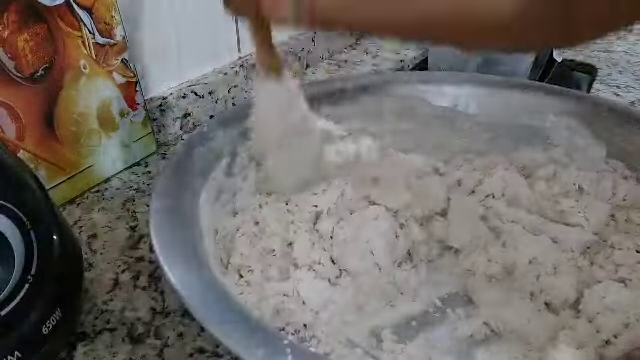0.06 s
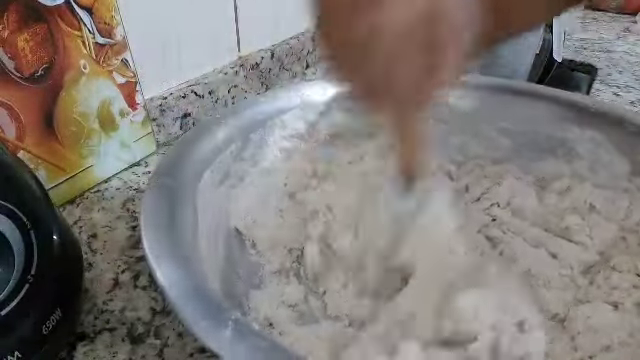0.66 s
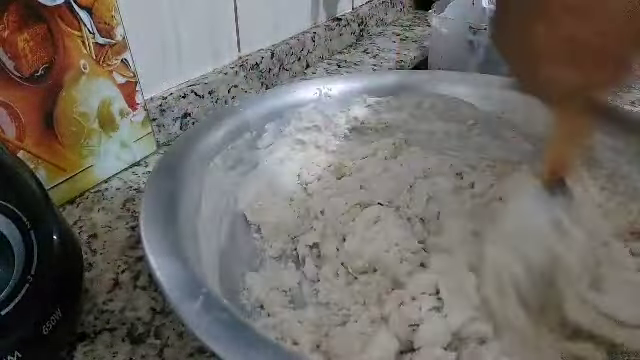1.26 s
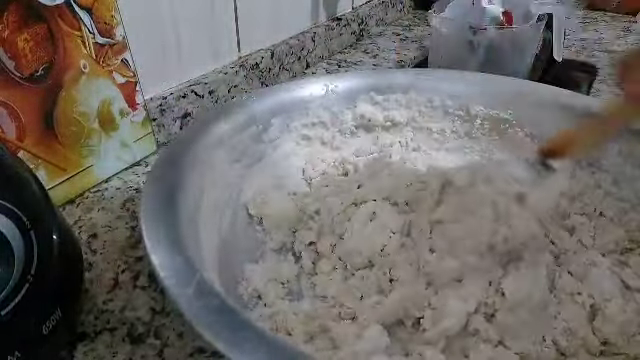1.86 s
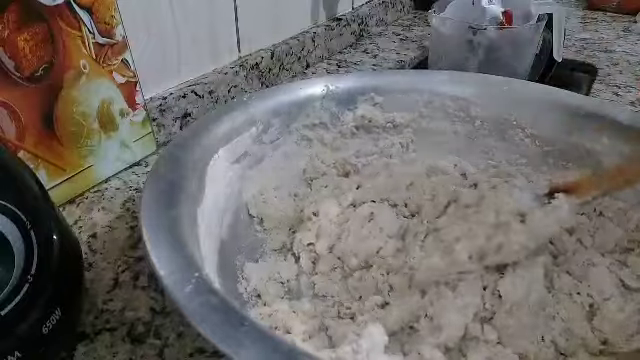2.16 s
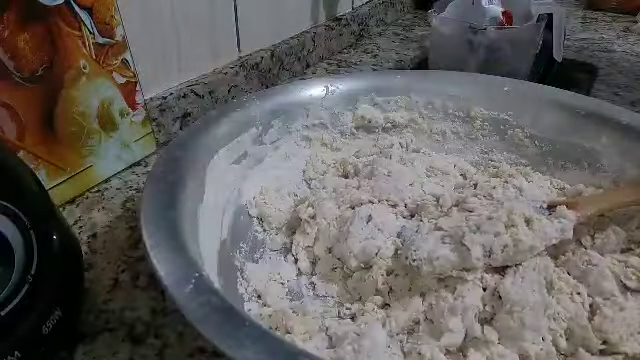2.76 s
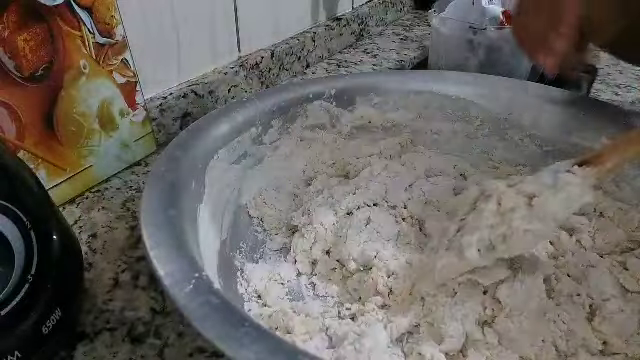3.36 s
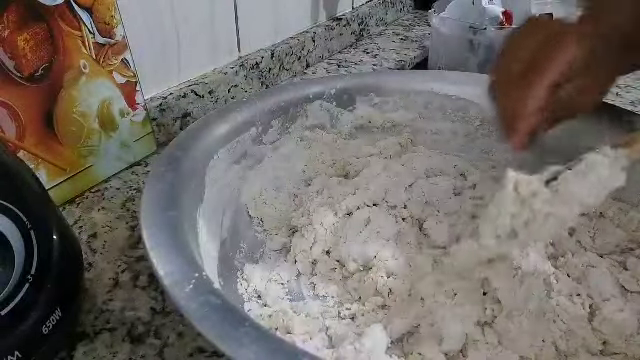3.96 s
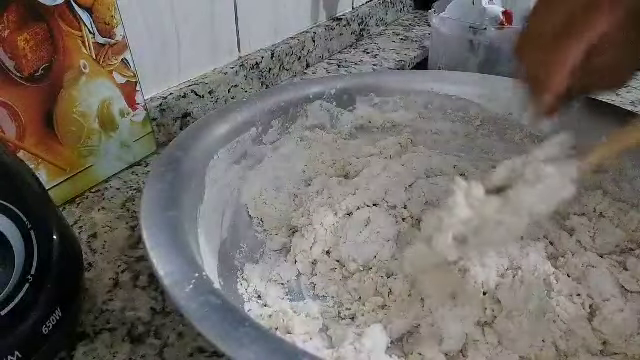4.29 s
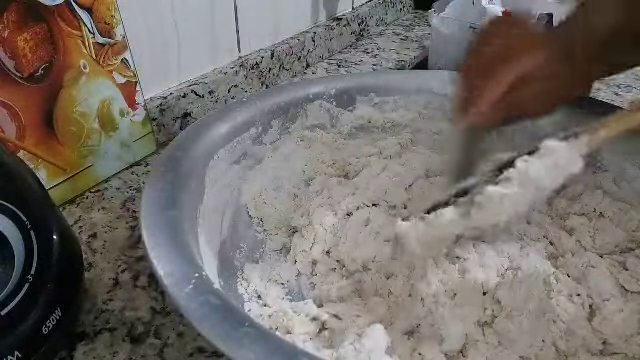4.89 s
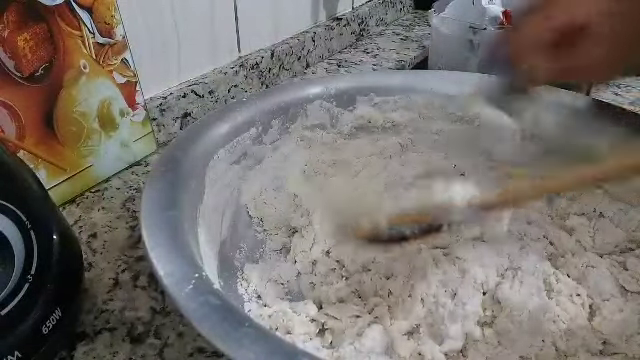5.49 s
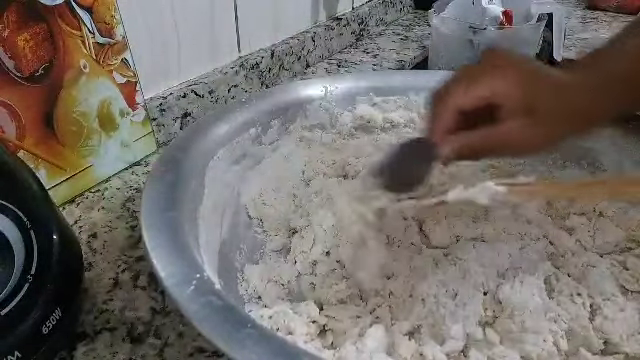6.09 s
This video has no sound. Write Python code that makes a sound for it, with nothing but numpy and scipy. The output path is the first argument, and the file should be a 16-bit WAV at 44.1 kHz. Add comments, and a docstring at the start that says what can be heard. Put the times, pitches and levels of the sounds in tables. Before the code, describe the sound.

For the first two seconds a wooden spoon stirs floury dough in a wide metal bowl: crumbs rustle, the wood rubs softly on the wall, and a lump flops with a dull thud at about 0.4 seconds. After a few light ticks, the handle drops on the rim at 2.3 seconds with a loud knock, bouncing quickly and making the bowl ring briefly. Around 2.8 seconds the bowl grates over a stone counter in two quick jerks, and loose flour slides. From 3.5 seconds to about 6, a metal spoon scrapes dough off the wooden one in short, quieter, squeaky strokes, mixed with dry ticks and soft thuds. One sharp, loud tap stands out at 5.7 seconds. Everything is close and straight ahead, with a little kitchen echo on the knocks and a faint appliance hum and hiss underneath.

```python
"""A wooden spoon stirs floury dough in a wide metal bowl: crumbs rustle and lumps flop over.
The spoon drops on the rim with a loud knock that sets the bowl ringing, and the bowl is shoved
over the kitchen counter. Then a metal spoon scrapes sticky dough off the wooden one in short,
squeaky strokes. The rubbing sounds are made of many tiny slips, coloured by what is rubbed.
A mains hum and a faint hiss lie under it all."""
import sys
import numpy as np
from scipy import signal
from scipy.fft import rfft, irfft, next_fast_len
from scipy.io import wavfile
from scipy.ndimage import uniform_filter1d, minimum_filter1d, map_coordinates

SR = 44100
rng = np.random.default_rng(int(sys.argv[2]) if len(sys.argv) > 2 else 0)


def unload_wav(signal):
    """Save mono or channel-first audio to the path in sys.argv[1] as 16-bit WAV at rate SR, clipped to [-1, 1]."""
    wavfile.write(
        sys.argv[1],
        SR,
        np.round(np.clip(np.atleast_2d(signal).T, -1, 1) * 32767).astype(np.int16),
    )


N = 275202
FFT_SIZE = next_fast_len(N, True)
TIME = np.arange(N) / SR
FREQ = np.maximum(np.fft.rfftfreq(FFT_SIZE, 1 / SR), 1)

# The spoon presses on the bowl's wall. Each row: middle in seconds, length in seconds,
# level in dB, pitch that stands out in Hz.
WALL_PRESSES = [(0.171, 0.11, -68, 1900), (0.364, 0.13, -60.5, 2720), (0.627, 0.25, -63.5, 1840),
                (1.057, 0.1, -65.5, 1900), (1.233, 0.16, -59, 2210), (1.777, 0.048, -65.5, 1750),
                (2.213, 0.27, -63.5, 1900)]
# The tone of a dull thud. Each row: frequency in Hz, relative level in dB.
THUD_COLOUR = [(100, -17.5), (220, -15.5), (350, -4), (700, -2.5), (1300, -6), (1900, -8.5), (3000, -25)]


def stirring():
    """Floury crumbs rustle past the wood and drag on the bowl, while loose flour slides down."""
    # How hard the spoon works, one list for each of four turns. Each pair: time in seconds, level in dB.
    turns = [
        [(0.0, -73), (0.08, -77.5), (0.416, -47.5), (0.502, -47.5), (0.6, -59.5), (0.696, -51.5), (0.9, -76.5)],
        [(0.9, -91), (0.932, -63.5), (1.054, -60.5), (1.156, -63.5), (1.22, -55), (1.3, -61), (1.45, -80)],
        [(1.45, -79), (1.456, -85), (1.548, -67), (1.628, -81), (1.66, -64), (1.786, -55), (1.94, -67)],
        [(1.94, -72), (1.97, -54.5), (1.994, -50.5), (2.046, -59.5), (2.082, -50), (2.302, -59.5), (2.305, -52)],
    ]
    # Sliding flour. Each row: peak time in seconds, hiss level in dB, rise in seconds, fade in seconds,
    # crumb level in dB relative to the hiss. A fade time (t60) is how long a sound takes to drop 60 dB.
    spills = [(.3, -54.5, 0.11, 0.68, -19), (1.08, -52.5, 0.15, 0.49, -22), (1.57, -63.5, 0.13, 1.4, -19),
              (1.981, -45, 0.04, 0.5, -16), (2.97, -46.5, 0.036, 1.2, -3.5), (3.56, -62.5, 0.068, 0.88, -3),
              (4.799, -70, .02, 0.39, -6), (5.46, -68, 0.059, .6, -6), (5.88, -62, .1, 1.02, -15)]
    # The tone of rubbed dough. Each row: frequency in Hz, relative level in dB.
    dough_colour = [(300, -15.5), (700, -6), (1300, -1.5), (2500, -4), (5000, 4.5), (8000, -0.5),
                    (10500, 4), (12500, 4), (14000, 0.5), (15500, -6)]
    # Pitches the bowl strengthens. Each row: pitch in Hz, width in Hz, boost in dB.
    bowl_peaks = [(1853, 188, 5.5), (2860, 970, 6), (4070, 870, 3.5)]
    crumbs = grains(per_s=4000, spread_db=2, smooth_db=3)
    low, middle, high = rubbing(crumbs, colour(dough_colour, bowl_peaks), body_hz=2370, edge_hz=6250)
    effort = from_db(np.interp(TIME, *np.vstack(turns).T, right=-150))
    fine = together(surge(s, db, rise_s, t60) for s, db, rise_s, t60, _ in spills)
    coarse = together(surge(s, db + crumb_db, rise_s, t60) for s, db, rise_s, t60, crumb_db in spills)
    pressed = together(from_db(db) * hump(s, length) for s, length, db, _ in WALL_PRESSES)
    drag = low * together([from_db(-8) * effort, from_db(-6) * coarse, from_db(-3) * pressed])
    rustle = middle * together([from_db(-2) * effort, coarse])
    flour_hiss = high * together([from_db(0.5) * effort, fine])
    return drag + rustle + flour_hiss


def flopping():
    """Lumps of dough turn over and flop down with dull thuds."""
    # Each row: peak time in seconds, level in dB, rise in seconds, fade in seconds.
    flops = [(0.437, -35.5, 0.014, 0.095), (.48, -39, 0.12, 0.36), (.69, -52.5, 0.25, 1.3),
             (.925, -56.5, 0.018, 0.37), (1.745, -58.5, 0.024, 0.24), (5.347, -55.5, 0.03, .15)]
    lumps = shaped(grains(per_s=310, spread_db=5.5, smooth_db=11), colour(THUD_COLOUR))
    return lumps * together(surge(*flop) for flop in flops)


def wall_singing():
    """The bowl sings faintly under each press; which pitch stands out depends on where the spoon is."""
    # The wall's broad resonances. Each row: pitch in Hz, half width in Hz, relative level in dB.
    wall_bands = [(1440, 91.6, -1), (1877, 130, 3), (2500, 260, -8.5), (4100, 250, -3)]
    slips = grains(per_s=400, spread_db=4, smooth_db=5.5)
    wall = shaped(slips, sum(from_db(db) * resonance(hz, width) for hz, width, db in wall_bands))
    out = np.zeros(N)
    for s, length, db, hz in WALL_PRESSES:
        note = from_db(-3) * shaped(slips, resonance(hz, half_width_hz=150))
        out += from_db(db) * hump(s, length) * (wall + note)
    return out


def knock(twin_ratio=1.011, twin_db=-9):
    """The handle cracks down on the rim and bounces; the bowl rings over a clang of many weak tones."""
    # The landing and its bounces. Each row: time in seconds, relative clack and ring levels in dB.
    bounces = [(2.3125, 0, 0), (2.3585, -4.5, -13), (2.412, -20, -27), (2.468, -29, -38), (2.523, -31, -42)]
    # The bowl's ringing tones. Each row: pitch in Hz, relative level in dB, fade in seconds.
    bowl_tones = [(190, -12, .3), (303, -14.5, .3), (516, -13.5, .35), (538, -14, .33), (558, -5, 0.27),
                  (713, -17.5, 0.36), (949, -6, .26), (960, 4, .27), (1014, -7, 0.38), (1349, 0, 0.3),
                  (1365, 5.5, .25), (1438, -5, .3), (1495, -3.5, .28), (1550, -5, .36), (1650, -5, .28),
                  (1690, 0.5, .28), (1750, -3, .28), (1816, -7, .4), (1846, 4.5, .28), (1895, -2.5, .42),
                  (1950, -13.5, .36), (2040, -8, .27), (3044, -20, .25), (3575, -5.5, .24),
                  (4230, -14, .36), (4380, -14.5, .36)]
    # The wooden handle's short clack, with the same columns.
    handle_tones = [(1380, -5, .075), (1690, -7, .04), (1880, 2, .075)]
    # The tone of the clang. Each row: frequency in Hz, relative level in dB.
    clang_colour = [(60, -57), (140, -25.5), (190, -11), (230, -11.5), (320, -8), (540, -6), (660, -16.5),
                    (900, -2.5), (1130, -13.5), (1400, -7), (1950, -8.5), (2300, -8.5), (2800, -15.5),
                    (4400, -14), (6200, -15), (8000, -28.5), (15000, -36)]
    # Clusters of the bowl's high tones. Each row: pitch in Hz, width in Hz, boost in dB.
    clang_peaks = [(3123, 250, 8), (3660, 81, 4.5), (4340, 320, 8), (6200, 500, 3)]
    times, clack_db, ring_db = np.transpose(bounces)
    # The bowl is not quite round, so each tone has a slightly higher twin that makes it waver.
    twins = [(hz * twin_ratio, db + twin_db, t60) for hz, db, t60 in bowl_tones]
    bowl = struck(clicks_at(times, from_db(ring_db - 25)), list(bowl_tones) + twins, rise_s=0.03)
    handle = struck(clicks_at(times, from_db(clack_db - 7)), handle_tones, rise_s=0.01)
    # The ringing carries little bass.
    ringing = signal.sosfilt(signal.butter(4, 130, "high", fs=SR, output="sos"), bowl + handle)
    crack = from_db(-28) * dying(times[0], t60=0.03) * noise(resonance(5700, half_width_hz=3000))
    clang_gain = together(from_db(db - 28) * dying(s, t60=0.35) for s, db in zip(times, clack_db))
    return ringing + crack + clang_gain * noise(colour(clang_colour, clang_peaks))


def shove(start_s=2.795, stop_s=2.984):
    """A faint hiss comes in, then the heavy bowl jerks twice, grating over stone, and stops dead."""
    # The faint hiss, then the two jerks.
    # Each row: peak time in seconds, level in dB, rise in seconds, fade in seconds.
    swells = [(2.775, -58, 0.038, 1.0), (2.817, -35, 0.025, 0.5), (2.955, -43, 0.048, 0.91)]
    # The tone of the rubbed counter. Each row: frequency in Hz, relative level in dB.
    counter_colour = [(45, -34), (70, -16), (100, 6.5), (160, 4.5), (400, 7), (700, 6.5), (1200, 0.5),
                      (2500, -1.5), (4800, 0), (7000, -5), (9000, -9.5), (12500, -8), (15500, -19)]
    grit = grains(per_s=900, spread_db=-2, smooth_db=7.5)
    low, middle, high = rubbing(grit, colour(counter_colour), body_hz=2770, edge_hz=8800)
    swell_gain = together(surge(*swell) for swell in swells)
    rumble = low * together([from_db(-39) * rising(start_s, rise_s=0.052), from_db(-3.5) * swell_gain])
    rasp = (middle + from_db(-8.5) * high) * swell_gain
    return (rumble + rasp) * falling(stop_s, t60=0.028)


def scraping(dulling_db_per_s=43, squeak_width_share=0.099):
    """The steel edge slips along doughy wood; two of its resonances squeak and whistle in each stroke."""
    # Each row: start in seconds, length in seconds, scrape level in dB, edge hiss in dB, low body in dB,
    # squeak pitch in Hz, squeak in dB, whistle pitch in Hz. Hiss, body and squeak are relative to scrape.
    strokes = [(3.602, 0.069, -54.5, 2.5, -6.5, 2280, -3.5, 12650),
               (3.821, .078, -62, 8.5, -6, 2170, -5.5, 14100),
               (3.932, 0.055, -49, 0.5, -21, 2220, -7, 14100),
               (3.97, 0.047, -45.5, 5.5, -2, 2170, -27, 12300),
               (4.067, 0.073, -60.5, -6, 1, 4500, -7, 12500),
               (4.375, 0.083, -44, 3.5, -3, 2310, -13, 11200),
               (4.439, 0.091, -45.5, -4, 0.5, 2450, -5, 12400),
               (4.897, 0.066, -56.5, 5.5, 0, 1554, -10, 14100),
               (4.919, 0.088, -50.5, 2, -9, 4230, -2, 12900),
               (5.311, 0.036, -58, 5.5, -4, 4320, -0.5, 14000),
               (5.512, 0.049, -62.5, 4, -5, 4400, -14, 12300),
               (5.671, 0.045, -45, -3.5, -2.5, 2446, -11, 11700),
               (5.733, .035, -47.5, -0.5, -10, 4440, -2, 12600),
               (6.007, 0.033, -63, 8.5, 1.5, 4430, -5, 12500), (6.064, .045, -50, 7, -3, 4700, 6.5, 12600),
               (6.087, 0.047, -42, 6.5, -1.5, 4230, -3.5, 12000)]
    # The tone of scraping steel. Each row: frequency in Hz, relative level in dB.
    steel_colour = [(200, -37), (450, -10.5), (750, 2), (1700, -4), (3000, 0.5), (5500, 0), (7000, -5.5),
                    (10000, -3.5), (13000, -10), (15500, -15.5)]
    # Pitches the spoon strengthens. Each row: pitch in Hz, width in Hz, boost in dB.
    spoon_peaks = [(804, 180, 3.5), (1360, 460, 8.9), (2090, 170, 9), (3080, 60, 0.85), (7820, 430, 5.8),
                   (11350, 270, 6.5), (12500, 660, 9.8), (14100, 440, 8.6)]
    slips = wall_echo(grains(per_s=3000, spread_db=4, smooth_db=3))
    low, middle, high = rubbing(slips, colour(steel_colour, spoon_peaks), body_hz=2810, edge_hz=6940)
    chatter = wall_echo(grains(per_s=880, spread_db=7, smooth_db=10))
    bodies, scrapes, edges, squeals = [], [], [], 0
    for s, length, db, edge_db, body_db, squeak_hz, squeak_db, whistle_hz in strokes:
        scrape = from_db(db) * stroke(s, length, tail_t60=0.38)
        # The spoon slows along the stroke, so its hiss dulls.
        dulling_db = dulling_db_per_s * np.clip(TIME - s, 0, length)
        edge = from_db(db + edge_db - dulling_db) * stroke(s, length, tail_t60=0.25)
        squeak = shaped(chatter, resonance(squeak_hz, squeak_hz * squeak_width_share))
        whistle = shaped(chatter, resonance(whistle_hz, half_width_hz=190))
        squeals += from_db(squeak_db) * scrape * squeak + from_db(-5.5) * edge * whistle
        bodies.append(from_db(body_db) * scrape)
        scrapes.append(scrape)
        edges.append(edge)
    return low * together(bodies) + middle * together(scrapes) + high * together(edges) + squeals


def stroke(s, length, tail_t60):
    """Loudness of one scrape: the edge bites, slides and lifts off; a tail lingers in bowl and room."""
    lift_off = falling(s + length, t60=0.095)
    tail = from_db(-2.5) * falling(s + length, tail_t60)
    return rising(s, rise_s=0.039) * np.maximum(lift_off, tail)


def wall_echo(x, near_s=0.00026, far_s=0.001082, sway=0.23, near_db=-11, far_db=-8):
    """Two echoes inside the bowl; their paths change as the hand moves, so the tone shifts."""
    out = x.copy()
    sway_times = np.arange(0, N / SR + 1, 0.12)
    for usual_s, db in ((near_s, near_db), (far_s, far_db)):
        delay_s = np.interp(TIME, sway_times, usual_s * (1 + sway * rng.standard_normal(len(sway_times))))
        out += from_db(db) * map_coordinates(x, [np.arange(N) - delay_s * SR], order=3)
    return rms_one(out)


def taps(snap_band_hz=(900, 5500)):
    """Spoons and falling crumbs land with a snap and a dry tick, plus a thud where the touch is heavy."""
    # Each row: time in seconds, base level in dB, dB added for the thud, dB added for the snap.
    contacts = [(0.6853, -39, -4, -4), (1.964, -43, -21, -4), (2.0648, -35.5, -6, -9),
                (2.2256, -32, -28, -8.5), (3.5385, -44, 10, -3), (3.5848, -41, -22, -2),
                (3.7894, -34.5, -22, -6), (3.925, -32, -24.5, -3), (4.2657, -37, -22.5, -1),
                (4.7865, -46, -30, -10), (5.4076, -42, -6, -3), (5.5173, -35, -9, -2),
                (5.6835, -32, 0, 23.5), (5.756, -40, -13, -4)]
    # The bright tone of a tick. Each row: frequency in Hz, relative level in dB.
    tick_colour = [(300, -18.5), (1500, -8.5), (4500, 5), (8000, 5), (12000, 12), (15500, -2.5)]
    times, base_db, thud_db, snap_db = np.transpose(contacts)
    band = signal.butter(2, snap_band_hz, "band", fs=SR, output="sos")
    snap = signal.sosfilt(band, clicks_at(times, from_db(base_db + snap_db)))
    tick_gain = sum(from_db(db - 5) * dying(s, t60=0.008) for s, db in zip(times, base_db))
    thud_gain = sum(from_db(db - 9) * dying(s, t60=0.018) for s, db in zip(times, base_db + thud_db))
    return snap + tick_gain * noise(colour(tick_colour)) + thud_gain * noise(colour(THUD_COLOUR))


def hollow_tones():
    """Soft hollow tones swell and fade: each is a narrow band of noise inside a faint wider one."""
    # Each row: middle in seconds, length in seconds, pitch in Hz, width in Hz, level in dB.
    tones = [(0.163, 0.052, 1330, 200, -64), (.689, 0.11, 548, 50, -59), (0.778, .1, 1022, 238, -51.5),
             (0.833, 0.063, 400, 34.6, -57.5), (1.232, .16, 387, 70, -60.5), (1.343, 0.072, 1100, 202, -61),
             (1.506, .14, 1420, 150, -66), (1.598, 0.1, 970, 172, -57.5), (1.783, .11, 1070, 340, -55.5),
             (2.093, 0.082, 840, 182, -57), (3.045, .08, 1138, 70, -62), (3.306, .14, 824, 115, -66),
             (3.415, 0.088, 1486, 68, -65.5), (3.654, 0.036, 700, 111.4, -55),
             (3.792, 0.31, 778, 108, -63.5), (3.998, 0.069, 750, 118, -55),
             (4.344, 0.113, 656, 88.8, -64.5), (5.08, 0.098, 400, 113.4, -65.5),
             (5.142, 0.31, 954, 372, -63.5), (5.467, 0.17, 388, 70, -67), (5.573, 0.15, 1430, 90, -66),
             (6.005, 0.13, 374.5, 89, -65)]
    out = np.zeros(N)
    for s, length, hz, width, db in tones:
        band = resonance(hz, width / 2) + from_db(-19) * resonance(hz, width * 1.5)
        out += from_db(db) * noise(band) * hump(s, length)
    return out


def kitchen_echo(x, dull_above_hz=6500, gap_s=0.0091):
    """Tiled walls send back a dense echo, a little duller than the sound itself."""
    tail = rng.standard_normal(N) * dying(gap_s, t60=0.6)
    tail = signal.sosfilt(signal.butter(1, dull_above_hz, fs=SR, output="sos"), tail[:SR])
    return signal.fftconvolve(x, tail / np.linalg.norm(tail))[:N]


def background(air_dip_share=0.3):
    """An appliance hums steadily, while still air and a faint hiss sink once and recover."""
    # The tones of the hum. Each row: pitch in Hz, level in dB.
    hum_tones = [(58.9, -75), (108, -93), (120, -86.5), (189, -79.5)]
    # The tone of the hiss, then of the air. Each row: frequency in Hz, relative level in dB.
    hiss_colour = [(500, -15.5), (2000, -12), (4000, -9.5), (8000, -3), (10500, 2), (12500, -3),
                   (15500, -15)]
    air_colour = [(25, -22), (50, -8), (70, -3.5), (110, -1.5), (190, -10.5), (300, -9.5), (550, -8),
                  (800, -7.5), (1150, -19.5), (1450, -5.5), (1800, -20.5), (3500, -18.5), (8000, -27.5),
                  (10700, -11), (15500, -26)]
    hum = sum(from_db(db) * np.sqrt(2) * np.sin(2 * np.pi * (hz * TIME + rng.random()))
              for hz, db in hum_tones)
    dip_db = -15.5 * hump(s=4.95, length=1.3)
    hiss = from_db(-68 + dip_db) * noise(colour(hiss_colour))
    air = from_db(-67 + air_dip_share * dip_db) * noise(colour(air_colour))
    return hum + hiss + air


def grains(per_s, spread_db, smooth_db):
    """Tiny slips of uneven size over the smooth hiss of countless smaller ones."""
    sizes = from_db(spread_db * np.minimum(rng.exponential(1, N), 4)) * rng.choice([-1, 1], N)
    slips = rms_one(sizes * (rng.random(N) < per_s / SR))
    return slips + from_db(smooth_db) * rng.standard_normal(N)


def rubbing(slips, gain, body_hz, edge_hz):
    """Slips heard through an object, split into equally strong low, middle and high parts."""
    body = 1 / (1 + (FREQ / body_hz) ** 10)
    edge = 1 / (1 + (edge_hz / FREQ) ** 10)
    return [shaped(slips, gain * part) for part in (body, 1 - body - edge, edge)]


def struck(blows, tones, rise_s):
    """Each tone builds up as the blow spreads through the object, then dies away."""
    return sum(from_db(db) * (ring(blows, hz, t60) - ring(blows, hz, rise_s)) for hz, db, t60 in tones)


def ring(clicks, hz, t60):
    """Each click starts a fading pure tone as strong as the click."""
    decay, angle = from_db(-60 / (t60 * SR)), 2 * np.pi * hz / SR
    return signal.lfilter([0, np.sin(angle)], [1, -2 * decay * np.cos(angle), decay ** 2], clicks + 1e-18)


def clicks_at(times, gains):
    """One click for each contact."""
    out = np.zeros(N)
    out[np.round(times * SR).astype(int)] = gains
    return out


def colour(points, peaks=()):
    """How strong each frequency is: a broad curve through the points, with peaks on top."""
    points_hz, points_db = np.transpose(points)
    curve_db = np.interp(np.log(FREQ), np.log(points_hz), points_db)
    peaks_db = sum(db / (1 + (2 * (FREQ - hz) / width) ** 2) for hz, width, db in peaks)
    return from_db(curve_db + peaks_db)


def resonance(hz, half_width_hz):
    """A peak that lets through the frequencies near one pitch."""
    return 1 / (1 + ((FREQ - hz) / half_width_hz) ** 2)


def shaped(x, gain):
    """Colour a sound with a gain for each frequency, then scale its power to 1."""
    return rms_one(irfft(rfft(x, FFT_SIZE) * gain, FFT_SIZE)[:N])


def noise(gain):
    """Steady noise with the given colour."""
    return shaped(rng.standard_normal(N), gain)


def rising(s, rise_s):
    """A smooth fade-in that starts at s seconds."""
    return np.sin(np.pi / 2 * np.clip((TIME - s) / rise_s, 0, 1)) ** 2


def falling(s, t60):
    """Full level until s, then 60 dB quieter every t60 seconds."""
    return np.exp(-np.log(1000) * np.clip((TIME - s) / t60, 0, 10))


def dying(s, t60):
    """A level that jumps up at s and dies away."""
    return (TIME >= s) * falling(s, t60)


def surge(s, db, rise_s, t60):
    """A level that rises to its peak at s and dies away."""
    return from_db(db) * rising(s - rise_s, rise_s) * falling(s, t60)


def hump(s, length):
    """A level that swells and fades evenly around s."""
    return 1 / (1 + ((TIME - s) / (length * 0.6)) ** 4)


def together(gains):
    """The level of unrelated sounds that overlap: their powers add."""
    return np.sqrt(sum(gain ** 2 for gain in gains))


def from_db(db):
    """Turn decibels into a gain, the number a sound is multiplied by."""
    return 10 ** (np.asarray(db) / 20)


def rms_one(x):
    """Scale a sound so its average power is 1."""
    return x / np.sqrt(np.mean(x ** 2) + 1e-20)


def scene():
    """Everything is close and straight ahead; the knock and the taps echo in the kitchen."""
    blow, ticks = knock(), taps()
    room = kitchen_echo(from_db(-17) * blow + from_db(-2) * ticks)
    dough = stirring() + flopping() + wall_singing()
    mix = dough + blow + ticks + room + scraping() + shove() + hollow_tones() + background()
    return np.tile(mix, (2, 1))


def record(dry, ceiling=0.95, cutoff_hz=15650):
    """Colour left and right differently, turn down any peak that is too loud and cut the top treble."""
    # Bands where the sides differ. Each row: centre in Hz, half width in Hz,
    # share added on the left and taken from the right.
    side_bands = [(1880, 380, -.28), (9830, 470, .25)]
    side_gain = sum(share * np.exp(-((FREQ - hz) / width) ** 2) for hz, width, share in side_bands)
    side = irfft(rfft(dry[0], FFT_SIZE) * side_gain, FFT_SIZE)[:N]
    heard = dry + np.array([side, -side])
    allowed_gain = np.minimum(1, ceiling / (np.abs(heard).max(axis=0) + 1e-9))
    smooth_gain = uniform_filter1d(minimum_filter1d(allowed_gain, size=101), size=101)
    treble_cut = signal.ellip(12, 0.1, 80, cutoff_hz, fs=SR, output="sos")
    return signal.sosfilt(treble_cut, heard * smooth_gain)


dry = scene()
out = record(dry)
unload_wav(out)
```